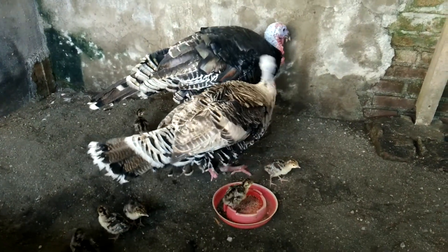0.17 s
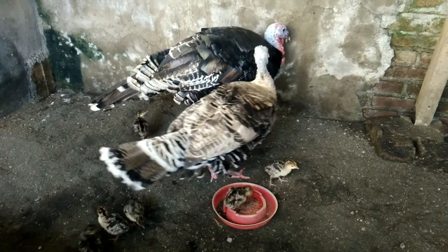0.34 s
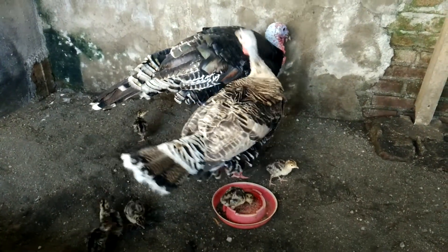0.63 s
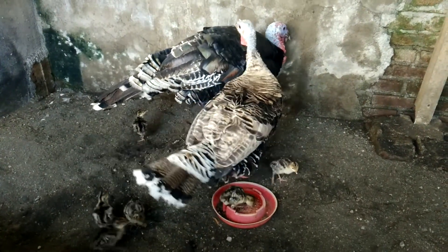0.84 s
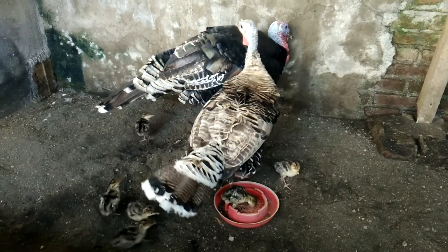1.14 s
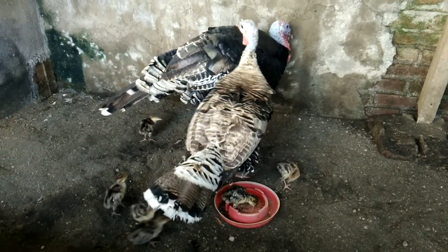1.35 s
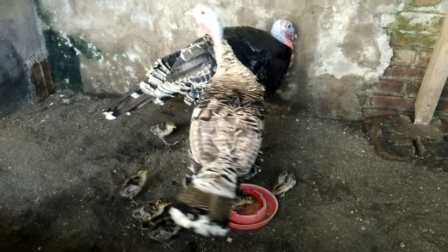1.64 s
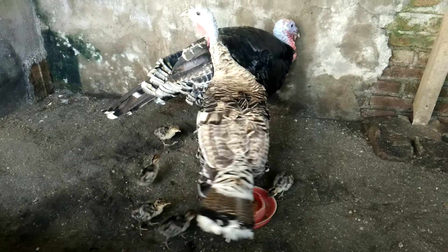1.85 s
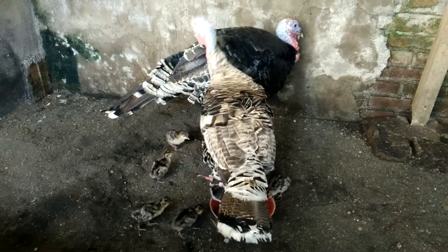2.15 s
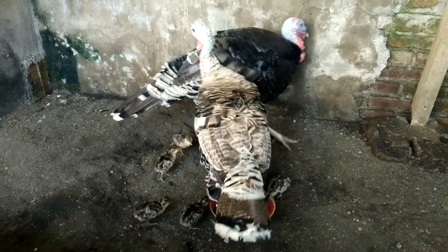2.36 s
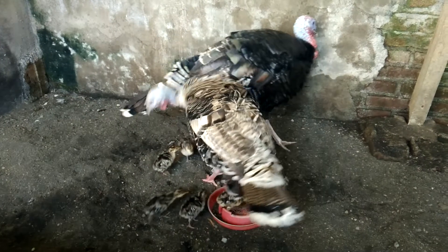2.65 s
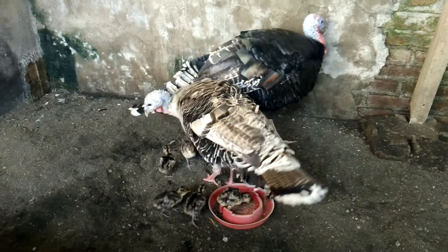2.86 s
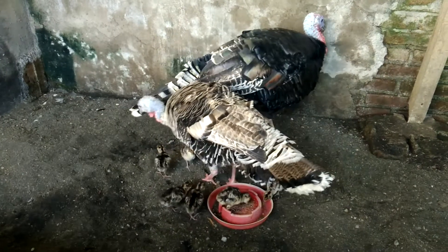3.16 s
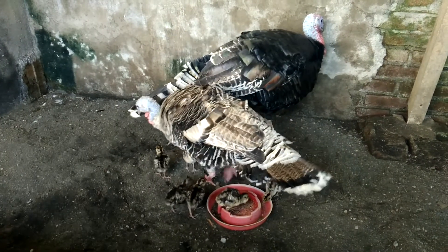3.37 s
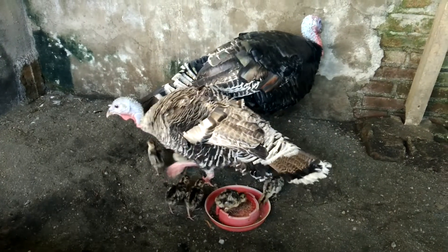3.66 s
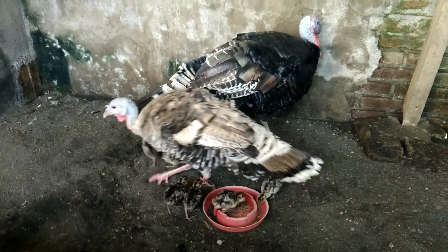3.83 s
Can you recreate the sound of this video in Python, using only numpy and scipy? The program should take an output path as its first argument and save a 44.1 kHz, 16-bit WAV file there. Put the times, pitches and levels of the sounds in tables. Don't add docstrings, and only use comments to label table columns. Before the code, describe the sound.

Turkey hens call close by: soft throbbing yelps at 0.2-0.55 s, stronger at 0.7-0.8, a low pulsed growl around 1.0-1.2, then yelps at 1.5-1.7, 2.1-2.4, 2.7-2.85 and raspier from 3.2 to the end. A chick's plunging peep repeats every 0.3 s until 2.4, amid arched and falling peeps. Faint thuds, foot scuffing, a knock at 3.0; short wall echoes, hiss, whine, air and distant motor.

```python
import sys
import numpy as np
from scipy import signal
from scipy.fft import rfft, irfft
from scipy.io import wavfile
from scipy.ndimage import uniform_filter1d

SR = 44100
rng = np.random.default_rng(int(sys.argv[2]) if len(sys.argv) > 2 else 0)


def dump(signal):
    limited = np.clip(np.atleast_2d(signal).T, -1, 1)
    pcm = np.round(limited * 32767).astype(np.int16)
    wavfile.write(sys.argv[1], SR, pcm)


def gain_from_db(level_db):
    decades = np.asarray(level_db, float) / 20
    return 10 ** decades


N = 176400
T = np.arange(N) / SR
TOP_HZ = 14230
YARD_DB = -9
HEN_LAG_S, HEN_PAN_DB = 0.00021, 6.1


def unit(x):
    return x / np.sqrt(np.mean(x ** 2) + 1e-30)


def walk(rate):
    k = int(SR / rate)
    jolts = np.repeat(rng.standard_normal(N // k + 1), k)
    return unit(uniform_filter1d(uniform_filter1d(jolts, k), k)[:N])


def band(x, hz, width_hz):
    return signal.lfilter(*signal.iirpeak(hz, hz / width_hz, SR), x)


def resonance(x, hz, width_hz):
    return band(band(x, hz, width_hz), hz, width_hz)


def coloured(points):
    p = np.array(points)
    f = np.arange(1, N // 2 + 2) * SR / N
    db = np.interp(np.log(f), np.log(p[:, 0]), p[:, 1], -60, -60)
    return unit(irfft(rfft(rng.standard_normal(N)) * gain_from_db(db) * (f < TOP_HZ), N))


def narrow(rows):
    return sum(gain_from_db(db) * unit(resonance(rng.standard_normal(N), hz, width_hz)) for hz, width_hz, db in rows)


def opposed(db):
    return gain_from_db(np.array([[db], [-db]]))


def place(x, pan_db, yard_db, lag_s=0.):
    t60_s, n = 0.2, SR // 2
    tail = rng.standard_normal((2, n)) * gain_from_db(-60 * T[:n] / t60_s) * (T[:n] > .004)
    tail = tail / np.sqrt((tail ** 2).sum(1, keepdims=True))
    wet = signal.fftconvolve(x[None], tail, axes=1)[:, :N]
    early = np.interp(T + lag_s, T, x)
    return np.array([x * gain_from_db(pan_db / 2), early * gain_from_db(-pan_db / 2)]) + gain_from_db(yard_db) * wet


def phone():
    # (frequency [Hz], level [dB per Hz])
    hiss_colour = [(2500, -5.5), (3700, 0.5), (4800, -9), (8000, -7), (14400, -5)]
    # (time [s], level [dB])
    hiss_level = [(0.0, -66), (0.59, -68), (0.67, -72), (0.88, -66.5), (0.99, -69.5), (1.07, -64.5),
                  (1.61, -68.5), (1.63, -62.5), (1.69, -67), (2.04, -64), (2.31, -70.5), (2.35, -67.5),
                  (2.87, -70.5), (2.93, -74), (3.12, -73), (3.83, -76.5), (3.97, -64.5), (4.0, -69)]
    # (frequency [Hz], wander [Hz], level [dB])
    whines = [(5645, 90.3, -76), (8430, 35, -76.5), (11130, 70, -78.5), (2714, 49.5, -69.5),
              (13300, 50, -91)]
    chop_hz, chop_db, chop_rate_hz, duty = 12420, -69.5, 24.8, 0.5
    time_s, level_db = np.array(hiss_level).T
    gain = gain_from_db(np.interp(T, time_s, level_db) + 1 + walk(45))
    turn = T * chop_rate_hz - .07
    gate = uniform_filter1d(1. * (turn % 1 < duty), 60)
    start = rng.uniform(0, 2 * np.pi, 200)[np.floor(turn).astype(int)]
    tones = gain_from_db(chop_db) * gate * np.sin(2 * np.pi * chop_hz * T + start)
    for hz, wander_hz, db in whines:
        phase = 2 * np.pi * np.cumsum(hz + wander_hz * walk(450)) / SR
        tones = tones + gain_from_db(db + 2.0 * walk(40)) * np.sin(phase)
    own = gain_from_db(-13) * np.array([coloured(hiss_colour), coloured(hiss_colour)])
    hiss = gain * (coloured(hiss_colour) + own)
    return (hiss + np.sqrt(gain / gain.mean()) * tones) * opposed(5.5 / 2)


def open_air():
    # (frequency [Hz], level [dB per Hz])
    air_colour = [(20, -39), (60, 1), (128, -7), (403, -10.5), (1690, -11.5), (2400, -14), (3600, -21),
                  (5200, -29.5)]
    # (frequency [Hz], width [Hz], level [dB])
    air_peaks = [(784, 55, -78.5), (2072, 52, -75.5), (2920, 385, -70.5)]
    air_db, alike = -63.5, 0.57

    def air():
        return gain_from_db(air_db + 0.73 * walk(5.6)) * coloured(air_colour) + narrow(air_peaks)

    both = air()
    pair = np.array([np.sqrt(alike) * both + np.sqrt(1 - alike) * air() for _ in range(2)])
    return pair * opposed(3.5 / 2)


def motor():
    # (frequency [Hz], width [Hz], level [dB])
    drone_bands = [(111.7, 15, -70.5), (130.2, 11.6, -68.5), (150, 15.5, -75)]
    return narrow(drone_bands) * gain_from_db(0.51 * walk(2.37)) * gain_from_db(np.array([[2.2], [-2.8]]))


def scuffle():
    # (time [s], level [dB])
    scuffle_level = [
        (.55, -74),
        (.8, -68),
        (1.301, -75),
        (2.2, -75),
        (2.9, -66),
        (3.25, -77.5),
    ]
    time_s, level_db = np.array(scuffle_level).T
    return gain_from_db(np.interp(T, time_s, level_db) + 2.4 * walk(24.86)) * narrow([(247, 243, 0)])


def burst(t, d, db, from_hz, to_hz):
    u = np.clip((T - t) / d, 0, 1)
    cycles = d * u * (from_hz + (to_hz - from_hz) * u / 2)
    return np.sqrt(2) * gain_from_db(db) * np.sin(np.pi * u) * np.sin(2 * np.pi * cycles)


def thumps():
    # (centre [s], level [dB], frequency [Hz], length [s])
    jolts = [
        (.15, -64, 48, 0.046),
        (.4, -60, 55.7, 0.064),
        (1.1, -65, 60.5, 0.057),
        (2.76, -63, 59.8, 0.046),
        (3.008, -55, 518, 0.0077),
        (1.645, -56, 2870, 0.00603),
    ]
    return sum(burst(t - d / 2, d, db, hz, hz) for t, db, hz, d in jolts)


def chicks():
    # (start [s], length [s], level [dB], top frequency [Hz])
    falls = [
        (0.345, 0.06, -69, 4490),
        (1.311, 0.03, -66, 4600),
        (2.008, .028, -65, 4600),
        (2.228, 0.039, -59, 5600),
        (3.042, 0.042, -67, 5000),
        (3.232, .022, -68, 3900),
        (3.378, 0.03, -63, 4450),
        (3.858, 0.027, -58, 3700),
        (3.895, 0.025, -61, 4150),
        (3.945, .02, -66, 4200),
    ]
    # (start [s], length [s], level [dB], top frequency [Hz])
    whistles = [(0.673, 0.1, -64, 4185), (.73, .04, -67, 2950), (0.89, .115, -58.5, 4440),
                (1.155, 0.09, -62, 4690), (1.345, .045, -66, 3900), (1.39, .03, -64, 4150),
                (1.425, 0.095, -60, 4750), (1.74, 0.09, -61.5, 4770), (2.033, 0.056, -55, 6990),
                (2.955, .035, -67, 4250), (3.0, 0.048, -66, 5150), (3.155, .05, -67, 3750)]
    # (knee [s], level [dB], starting frequency [Hz])
    plunges = [
        (.008, -56.5, 7060),
        (0.293, -58.5, 7270),
        (0.589, -60.5, 7030),
        (.888, -61, 7000),
        (1.194, -60.5, 6780),
        (1.518, -60, 6600),
        (1.818, -58, 6660),
        (2.106, -59.5, 7130),
        (2.405, -66, 6660),
    ]
    # ([Hz], [Hz])
    plunge_hz = [6250, 2900]
    # (frequencies [Hz], levels [dB])
    beak = [3000, 3900, 4250, 4550, 5500, 6350, 6800, 7300], [-2, -4, -3, 2, 2, -1, -8, -14]
    # (delay [s], level [dB])
    wall_echoes = [(.011, -27.5), (.023, -11.5), (.037, -14.5)]
    plunge_s, knee = .07, .64
    arch, crest = .075, .55
    pan_db_per_oct, pan_hz = 13, 5600

    def fall(u, top_hz):
        return top_hz + (3055 - top_hz) * u ** 1.3

    def plunge(u, start_hz):
        line = np.interp(u, [0, knee, 1], [start_hz, *plunge_hz])
        return uniform_filter1d(line, size=350, mode="nearest")

    def whistle(u, top_hz):
        return top_hz * (1 - arch * ((u - crest) / crest) ** 2)

    crowd = [(4 * a, .018 * (1 + b), -73 - 8 * c, 3300 * (1 + e / 3)) for a, b, c, e in rng.random((40, 4))]
    peeps = [(t, d, db, 0, fall, hz) for t, d, db, hz in falls + crowd]
    peeps += [(t - knee * plunge_s, plunge_s, db, 0, plunge, hz) for t, db, hz in plunges]
    peeps += [(t, d, db, -6, whistle, hz) for t, d, db, hz in whistles]
    out, tilt_db = np.zeros(N), np.zeros(N)
    flutter, quiver = gain_from_db(2.2 * walk(90)), 1 + .005 * walk(500)
    for t, d, db, aside_db, contour, start_hz in peeps:
        on = (T >= t) & (T < t + d)
        u = (T[on] - t) / d
        hz = contour(u, start_hz)
        tone = np.sin(2 * np.pi * np.cumsum(hz * quiver[on]) / SR)
        out[on] += gain_from_db(db) * np.sqrt(np.sin(np.pi * u)) * gain_from_db(np.interp(hz, *beak)) * tone
        tilt_db[on] = aside_db + pan_db_per_oct * np.log2(hz / pan_hz)
    out = np.sqrt(2) * out * flutter
    echoes = sum(gain_from_db(db) * np.interp(T - np.array([[lag_s], [1.1 * lag_s]]), T, out)
                 for lag_s, db in wall_echoes)
    return place(out, tilt_db, -1.5, .00004) + echoes


def strands():
    # (start [s], length [s], level [dB], from [Hz], to [Hz])
    strand_rows = [
        (.604, .045, -58, 880, 850),
        (.61, .03, -59, 1120, 1080),
        (2.15, .05, -60, 1230, 1170),
        (2.7, .055, -64, 1330, 1300),
        (2.71, .04, -64, 1090, 1130),
    ]
    voice = sum(burst(*row) for row in strand_rows) * gain_from_db(3.5 * walk(120.4))
    return place(voice, HEN_PAN_DB, YARD_DB, HEN_LAG_S)


def growls():
    # (start [s], length [s], level [dB], throat scale [ratio], open-beak brightness [dB])
    growl_rows = [
        (0.588, 0.05, -58.5, 1.075, 1),
        (1.014, 0.053, -48, 1.0, 5),
        (1.061, 0.064, -45.5, 1.0, -7.5),
        (1.106, .06, -54.5, 1.0, -8),
        (1.143, 0.086, -63.5, 0.99, -4),
        (2.259, 0.15, -65.5, 0.44, -1.5),
    ]
    # (frequency [Hz], width [Hz], level [dB])
    throat = [(373, 203, -8), (811, 232, 3.5), (1110, 53, 4.5), (1665, 360, -11)]
    rate_hz, jitter, scatter_db, breath = 125, .45, 3.5, 1.1
    chance = rng.standard_normal((600, 2))
    at = (np.cumsum(np.exp(jitter * chance[:, 0])) / rate_hz * SR).astype(int)
    pulses = np.zeros(N)
    pulses[at[at < N]] = gain_from_db(scatter_db * chance[at < N, 1])
    drive = unit(pulses) + breath * rng.standard_normal(N)
    out = 0
    for t, d, db, scale, bright_db in growl_rows:
        gate = np.interp(T, [t, t + 0.0086, t + 0.64 * d, t + d + 0.0095], [0.025, 1, 1.0, 0.019])
        ring = sum(gain_from_db(g + bright_db * (hz > 1e3)) * resonance(drive * gate, hz * scale, width_hz * scale)
                   for hz, width_hz, g in throat)
        out = out + gain_from_db(db) * unit(ring) * np.sqrt(d * SR / N)
    return place(out, HEN_PAN_DB, YARD_DB, HEN_LAG_S / 2)


def hens():
    # (centre [s], width [s], level [dB], pitch [Hz])
    voice_swells = [(.06, 0.097, -65.5, 1060), (0.254, 0.013, -48, 1041), (0.289, 0.035, -49, 1063),
                    (0.344, 0.066, -46.5, 1009), (0.385, 0.019, -42.5, 937), (0.421, 0.035, -48.5, 949),
                    (0.47, 0.046, -49.5, 927), (0.519, 0.019, -48.5, 932), (.555, 0.024, -58, 921),
                    (.699, 0.011, -46.5, 1081), (0.71, 0.0088, -42.5, 1024), (.725, 0.012, -53, 1022),
                    (.748, 0.019, -40.5, 1000), (0.769, 0.037, -38.5, 953), (0.791, 0.016, -47, 911),
                    (.802, 0.0088, -40.5, 961), (1.483, 0.0094, -60.5, 811), (1.499, 0.015, -45.5, 960),
                    (1.536, 0.081, -51, 1037), (1.57, .013, -34.5, 992), (1.583, 0.018, -34, 943),
                    (1.599, 0.0097, -36, 897), (1.608, .012, -52, 931), (1.619, 0.019, -37, 916),
                    (1.636, .011, -36, 850), (1.649, 0.016, -42.5, 885.3), (1.664, 0.0072, -39.5, 926),
                    (1.686, 0.022, -53, 853),
                    (2.125, 0.008, -51, 743), (2.14, 0.018, -51.5, 920), (2.19, 0.026, -56, 970),
                   (2.215, 0.025, -35, 960), (2.245, 0.022, -40.5, 966), (2.263, 0.016, -35.5, 970.4),
                   (2.296, 0.03, -39.5, 949), (2.324, 0.02, -44, 934), (2.347, 0.016, -50.5, 931.3),
                   (2.385, 0.041, -63.5, 925), (2.688, 0.0075, -45.5, 807), (2.703, 0.011, -52, 1103),
                   (2.755, 0.0091, -40.5, 1110), (2.772, 0.016, -35, 1019), (2.786, .008, -40, 960),
                   (2.801, 0.013, -36.5, 956), (2.815, .012, -44.5, 933), (2.83, 0.013, -36.5, 931),
                   (2.843, 0.0097, -43, 959), (2.853, 0.0077, -51, 953), (2.869, 0.0063, -52.5, 944),
                    (3.2, 0.035, -49, 1164), (3.229, 0.032, -47.5, 1135), (3.264, 0.018, -47.5, 1080),
                   (3.286, 0.028, -41.5, 1050), (3.307, .01, -41, 1030), (3.323, 0.013, -43, 1009),
                   (3.336, .008, -52, 1000), (3.55, 0.014, -56, 1059), (3.58, 0.04, -47.5, 1169),
                   (3.626, 0.015, -38.5, 1026), (3.647, 0.023, -34.5, 959), (3.665, 0.0048, -34, 976.7),
                   (3.676, 0.013, -45, 916), (3.7, .015, -55, 920), (3.894, 0.013, -65, 1009),
                   (3.925, 0.065, -50, 1141), (3.972, 0.032, -38.5, 1047), (3.991, 0.013, -38, 1036)]
    # (start [s], half-pitch level [dB], octave level [dB], left-right [dB], rasp level [dB])
    calls = [(.2, -49, -48, 6, -39), (0.331, -15, -18, 3, -16), (.41, -25, -12, 5, -19),
             (.66, -26.5, -29, 6, -27), (1.399, -27, -31, 6, -26), (1.599, -23, -33, 4.5, -27),
             (2.1, -33, -40, 8, -25), (2.6, -32, -31, 4.5, -30), (2.79, -26, -29, 4.5, -22),
             (3.1, -30, -40, 4.5, -18), (3.25, -17, -28, 0.5, -16.5), (3.501, -23, -27, 4.5, -29),
             (3.61, -21, -36, 2, -12.5), (3.85, -8.5, -38, 4, -5.5), (3.95, -10.5, -30, 0.5, -17)]
    skirt, cut = 3.5, 1.145
    swells = np.array(voice_swells)
    power = 0
    for t, width_s, db, _ in swells:
        away = np.abs(2 * (T - t) / width_s * np.where(T > t, cut, 1 / cut))
        power = power + gain_from_db(2 * db) * np.exp(-np.log(4) * away ** skirt)
    env = np.sqrt(power)
    pitch_hz = np.interp(T, swells[:, 0], swells[:, 3]) * (1 + 0.01264 * walk(70))
    phase = 2 * np.pi * np.cumsum(pitch_hz) / SR
    c = np.array(calls)
    current = np.clip(np.searchsorted(c[:, 0], T) - 1, 0, None)
    half_db, oct_db, pan_db, rasp_db = uniform_filter1d(c[current, 1:].T, 400)
    voice = np.sin(phase) + gain_from_db(half_db + 2 * walk(50)) * np.sin(phase / 2)
    rasp = narrow([(743, 430, 0)])
    body = env * (np.sqrt(2) * voice + gain_from_db(rasp_db) * rasp)
    octave = env * gain_from_db(oct_db) * np.sin(2 * phase)
    return place(body, pan_db, YARD_DB, HEN_LAG_S) + place(octave, -12, YARD_DB)


def scene():
    background = phone() + open_air() + motor() + scuffle() + thumps()
    return background + chicks() + strands() + growls() + hens()


def band_limit(x):
    return signal.sosfilt(signal.butter(12, 14610, fs=SR, output="sos"), x)


def record(dry):
    return band_limit(dry)


dry = scene()
out = record(dry)
dump(out)
```